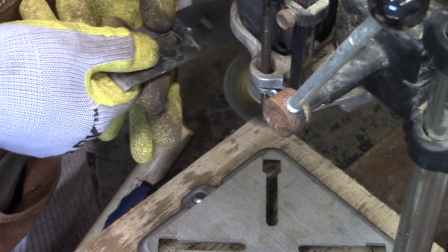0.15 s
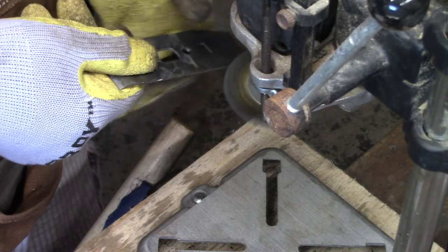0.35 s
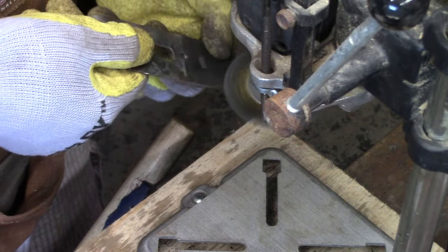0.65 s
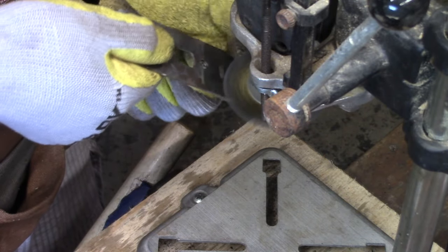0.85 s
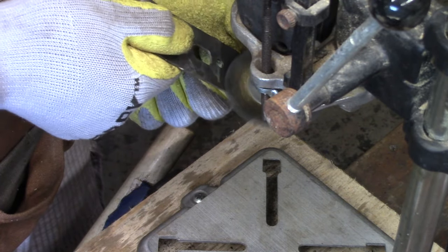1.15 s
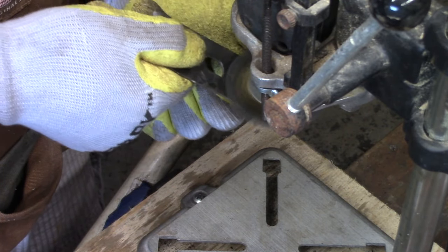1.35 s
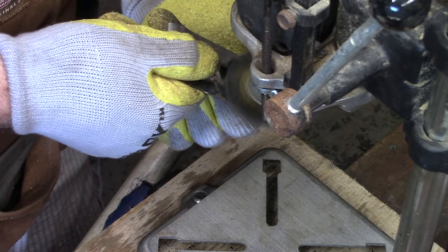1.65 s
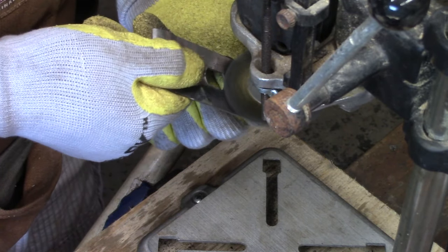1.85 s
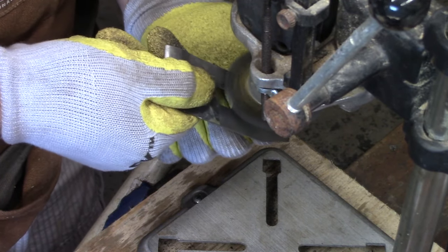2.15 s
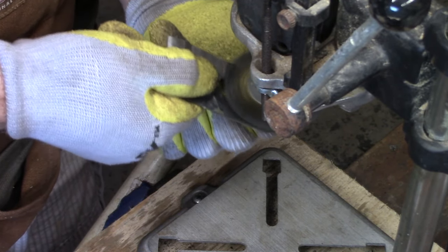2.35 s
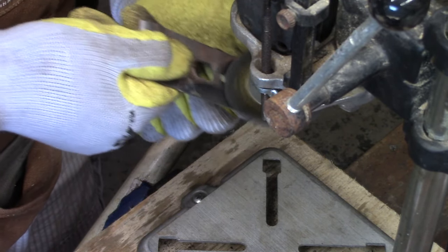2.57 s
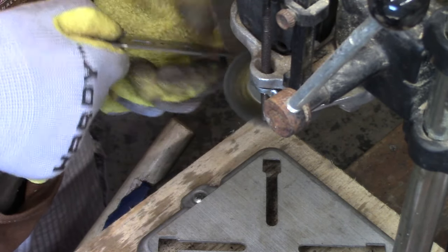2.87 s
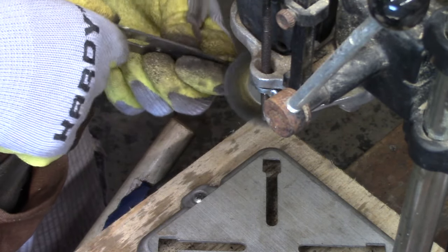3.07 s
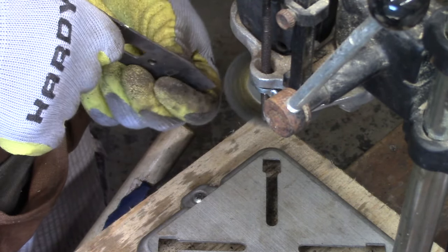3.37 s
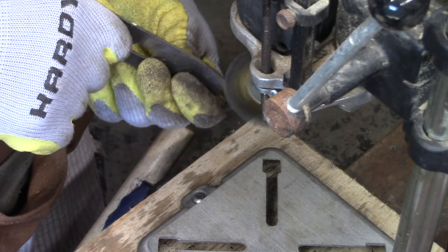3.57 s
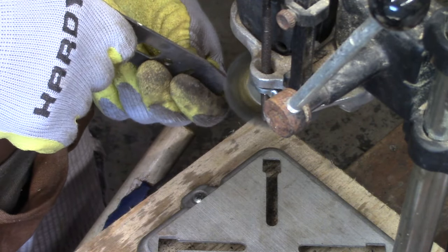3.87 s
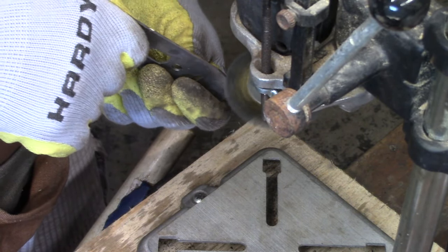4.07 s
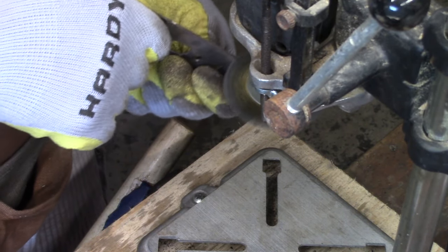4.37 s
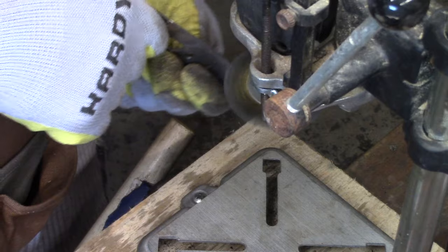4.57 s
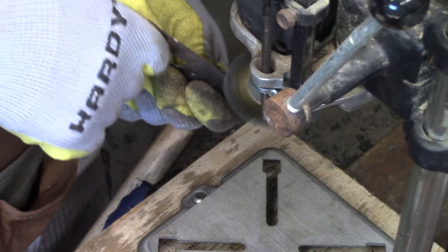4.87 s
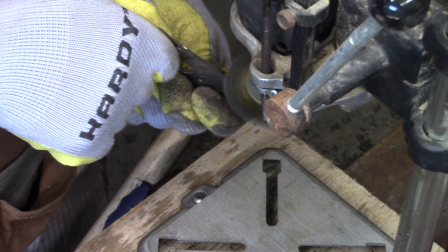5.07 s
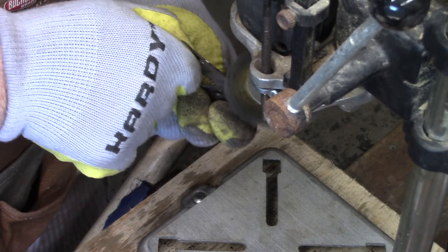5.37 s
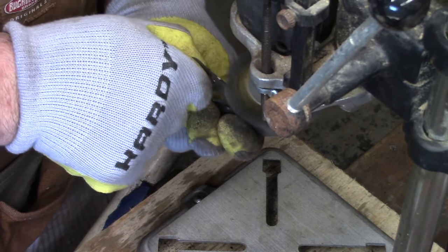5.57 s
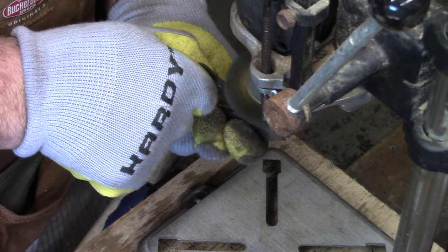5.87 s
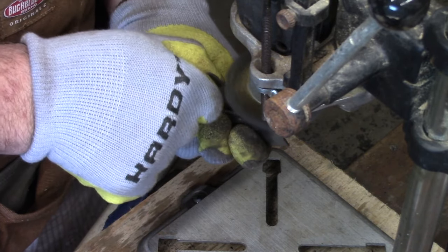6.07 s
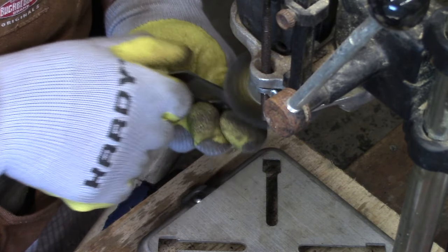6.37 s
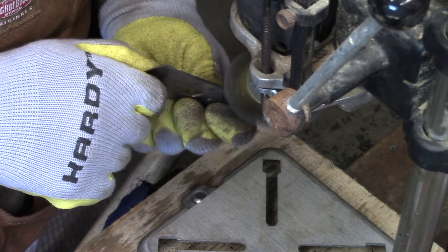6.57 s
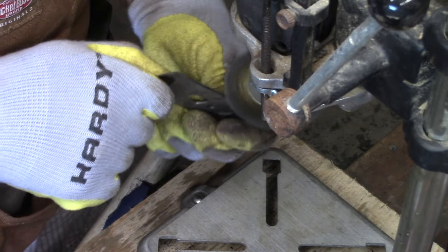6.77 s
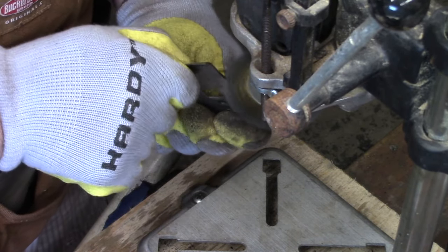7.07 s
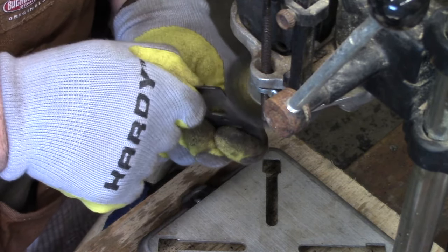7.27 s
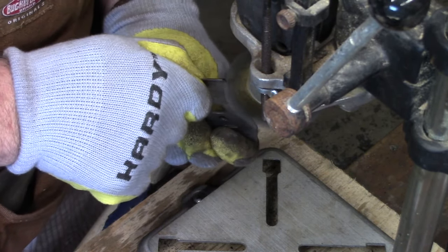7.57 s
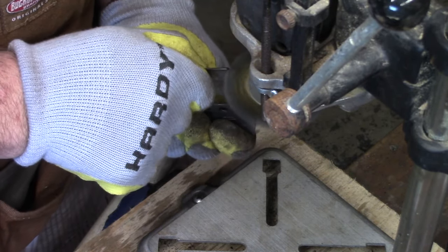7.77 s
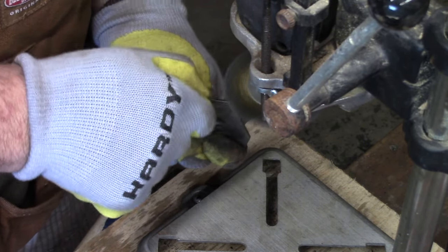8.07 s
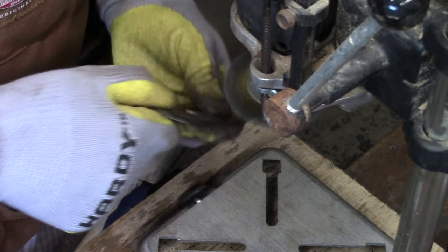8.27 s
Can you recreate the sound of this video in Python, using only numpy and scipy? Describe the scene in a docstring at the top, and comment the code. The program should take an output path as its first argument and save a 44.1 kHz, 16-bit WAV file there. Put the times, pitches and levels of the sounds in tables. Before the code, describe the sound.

Loud rattling workshop machine runs steadily while a spinning wire brush rasps against steel in uneven passes, its pitch sagging under pressure, with shrill ringing and squeals.

```python
"""A drill press clatters; its twelve-tuft wire wheel scratches a steel blade, hand-held, in several strokes.
Random impacts through frame resonances make the clatter; the spindle slows under load, gliding spindle and
tuft tones while mains hum and blade ring hold pitch. Wire-tip impacts, bunched by tuft, make the scratch.
Strokes bring buzz, stronger with drag, and frame shudder at set levels; tuft-rate harmonics make the blade sing.
Noise bands make squeals; impact bursts make snags, each with a later thud."""
import sys
import numpy as np
from scipy import signal
from scipy.fft import rfft, irfft, next_fast_len
from scipy.io import wavfile
from scipy.ndimage import uniform_filter1d

SR = 44100
rng = np.random.default_rng(int(sys.argv[2]) if len(sys.argv) > 2 else 0)


def generate_wav(sig):
    """Save sig (samples, or channels by samples) to the path in sys.argv[1] as 16-bit PCM at SR."""
    pcm = np.round(np.clip(np.atleast_2d(sig).T, -1, 1) * 32767).astype(np.int16)
    wavfile.write(sys.argv[1], SR, pcm)


N = 371763

# spindle speed, sagging as the hand leans in: time_s, speed_turns_per_s
SPINDLE_SPEED = [(0.0, 44.85), (0.4, 45.15), (1.08, 45.0), (1.49, 43.6), (1.69, 42.03), (1.77, 41.84),
                 (2.06, 43.36), (2.32, 43.15), (2.51, 42.26), (2.89, 44.18), (3.25, 44.8), (3.57, 44.96),
                 (3.76, 43.99), (4.05, 43.39), (4.26, 41.71), (4.4, 40.05), (4.49, 39.76), (4.55, 39.97),
                 (4.64, 41.08), (4.8, 42.7), (4.89, 41.95), (5.0, 42.57), (5.16, 42.57), (5.43, 41.52),
                 (5.7, 42.05), (6.05, 42.21), (6.54, 44.35), (6.88, 44.92), (7.12, 43.21), (7.35, 43.45),
                 (7.82, 41.41), (8.02, 41.5), (8.43, 44.1)]
# head, column and table resonances: centre_hz, width_hz, level_db
FRAME_MODES = [(172, 29, 8.5), (261.5, 48, 11), (487, 48, 8.5), (565, 152, 5), (762, 38, 5.5),
               (930, 34, 5.5), (990, 82, 5.5), (1094, 78, 6), (1230, 29, 6), (1294, 160, 6),
               (1687, 37, 8.5), (1809, 90, 9), (1936, 80, 7.5), (2017, 89, 9), (2094, 60, 5), (2259, 60, 6),
               (2460, 71, 7), (2662, 110, 4.5), (3030, 84, -5), (3770, 150, 3), (4620, 230, -4.5),
               (5240, 480, 2), (6300, 220, -4), (6850, 200, -1.5)]
# bearing clatter, broad colour: freq_hz, relative_level_db
CLATTER_COLOUR = [(30, -51), (70, -43), (140, -29.5), (220, -22.5), (430, -10), (900, -1.43), (1500, 0.5),
                  (2200, -0.14), (4000, -1.34), (7500, -8), (10600, -7.5), (11800, -17), (15400, -25)]
# clatter level change: time_s, level_db
CLATTER_LEVEL = [(0, 0.4), (1.1, 0.4), (1.5, 0), (3.3, 0), (3.58, 0.3), (3.85, 0), (4.55, 0), (4.85, 0.5),
                 (5.2, -0.3), (6.8, 0.5), (7.9, -0.6), (8.43, 0.6)]
# free-running machine tones, before WHINE_GAIN_DB: multiple_of_spindle_speed, level_db
WHINE_TONES = [(12, -68), (24, -57), (48, -48.6), (60, -56.5), (120, -60), (240, -63)]
# blade strokes on the wheel; levels before bite, lean and layer gains: start_s, end_s, scratch_db,
# first_bite_db, shudder_db, extra_buzz_db, song_db, song_tilt_db_per_octave, blade_ring_db
STROKES = [(0.02, 1.078, -47.5, 2, -76, 6, -58, -5, -52), (1.07, 1.807, -35.5, -1, -58, 1, -34, -10, -57),
           (1.88, 2.062, -39, -3, -61, 4, -56, -5, -56),
           (2.058, 2.53, -35.5, -2.5, -57, 0.5, -37, -8.5, -61),
           (2.55, 3.58, -44.5, 8, -76, 0, -62, -5, -60), (3.613, 3.76, -32.5, -1.5, -52, -4, -47, 1, -55),
           (3.878, 4.542, -36, 2.5, -52.5, 0.5, -40, -5.5, -58),
           (4.8, 4.893, -35.5, 2, -54, -8, -45, -5, -52), (4.94, 5.426, -35, -1.5, -54, -1, -42, -3.5, -50),
           (5.438, 6.18, -36, 0, -56, 0.5, -41, -5, -54), (6.908, 7.196, -37, 5.5, -61, -3, -40, -5, -45),
           (7.324, 7.988, -36.5, 2, -56.5, 1, -39, -5.5, -51)]
# wire scratch, broad colour: freq_hz, relative_level_db
SCRATCH_COLOUR = [(30, -38), (200, -38), (400, -18.5), (900, -3.5), (1500, -16.5), (2400, -4.5), (3400, 2),
                  (4500, -2.5), (7000, -6), (10400, -5), (11800, -14), (15400, -30.5)]
# spindle (lowest) and hand-damped blade resonances: centre_hz, width_hz, level_db
BLADE_MODES = [(506, 24, 3), (3500, 260, -3), (3790, 170, 1), (4450, 250, -4), (8350, 240, 1),
               (10500, 450, -3), (12800, 380, 0), (14650, 300, 8)]
# loaded wheel tones, relative to scratch level, before BUZZ_GAIN_DB: multiple_of_spindle_speed, level_db
BUZZ_TONES = [(2, -48), (36, -26), (72, -18), (90, -18.5), (96, -20), (156, -24), (228, -25)]
# frame shudder colour: freq_hz, relative_level_db
SHUDDER_COLOUR = [(30, -39), (115, -13), (150, -26), (210, -15.5), (272, 12.5), (320, 3.5), (450, -11.5),
                  (900, -53)]
# harmonics on which the blade sings: multiple_of_tuft_rate, relative_level_db
SONG_HARMONICS = [(7, -4), (14, -5), (21, -3)]
# sharp modes lifting the song as it glides through: centre_hz, width_hz, level_db
SONG_MODES = [(3590, 170, 0), (6700, 200, 13), (7150, 260, -3), (7500, 150, 6.5), (10030, 200, 9),
              (10600, 420, 10.5)]
# wires catching on the blade: start_s, end_s, centre_hz, width_hz, level_db
SQUEALS = [(1.5, 1.717, 3700, 480, -39), (2.38, 2.53, 3720, 300, -40), (3.9, 4.16, 3700, 800, -39.5),
           (3.62, 3.77, 12900, 180, -48), (3.62, 3.77, 14720, 330, -53), (3.88, 4.02, 12880, 160, -53),
           (4.18, 4.4, 6600, 220, -41), (5.15, 5.31, 12170, 130, -52), (5.28, 5.5, 12650, 130, -52),
           (6.91, 7.1, 8350, 200, -47), (6.91, 7.06, 10850, 300, -48), (6.91, 7.1, 3650, 900, -38),
           (5.31, 5.4, 4800, 1700, -36), (5.6, 6.2, 3745, 90, -43), (7.53, 7.82, 3510, 120, -39),
           (7.56, 7.82, 8330, 200, -48)]
# wheel snatching at a blade edge: centre_s, half_length_s, level_db
SNAGS = [(4.26, 0.006, -37.5), (4.848, 0.031, -31), (5.22, 0.026, -37)]
# snag colour: freq_hz, relative_level_db
SNAG_COLOUR = [(30, -30), (140, -26), (400, -11), (1000, -2), (3200, 7), (6000, -9), (15400, -35)]
# frame thud colour: freq_hz, relative_level_db
THUD_COLOUR = [(30, -26), (110, -16), (160, -4.5), (200, -11), (275, 4), (400, 1), (900, -38)]

TUFTS = 12
EASE_S = .06  # averaging window: spindle mass rounds off speed changes
IDLE_TURNS_PER_S, INERTIA_S = 45.12, .3007  # unloaded speed; spindle lag behind load
USUAL_DRAG_TURNS_PER_S = 4  # drag at which lean adds nothing
MAINS_HUM_DB, WHINE_GAIN_DB, BUZZ_GAIN_DB = -82.5, 1, 4.5
GRIP_S = .04  # ramp as wires bite or let go
BITE_S, RELEASE_S = 0.092, 0.047  # time constants: first bite; brushing as the blade is drawn back
FREE_SCRATCH_DB, FREE_SHUDDER_DB = -49, -63.5  # wheel between strokes, at full speed
FREE_SCRATCH_DB_PER_TURN_LOST = 0.5  # swish rises per turn/s lost
SCRATCH_DB_PER_DRAG, SONG_DB_PER_DRAG = 0.58, 0.7  # per turn/s; song only up to usual drag
HUM_DB = -9  # tuft hum at its mode's centre, relative to stroke scratch level
SONG_TOP_HZ = 11150  # song fades steeply above
RING_HZ, RING_WIDTH_HZ = 3800, 32  # blade's own note, independent of spindle speed
THUD_LAG_S, THUD_WIDTH_S, THUD_DB = 0.039, 0.045, -17.5  # delay, half length, level re snag
TOP_HZ = 15600  # recorder cutoff


def undb(db):
    """Decibels to gain."""
    return 10 ** (np.asarray(db) / 20)


def unit(x):
    """Scale to rms 1."""
    return x / np.sqrt(np.mean(x ** 2))


def walk(rate_hz):
    """Smooth random signal, rms 1, changing about rate_hz times a second."""
    size = next_fast_len(N, real=True)
    hz = np.arange(size // 2 + 1) * SR / size
    spectrum = rfft(rng.standard_normal(size)) / (1 + (hz / rate_hz) ** 2)
    return unit(irfft(spectrum, size)[:N])


def lag(x, seconds):
    """One-pole follower with the given time constant."""
    keep = np.exp(-1 / (seconds * SR))
    return signal.lfilter([1 - keep], [1, -keep], x)


def strikes(per_second, scatter_db):
    """Tiny impacts at random moments, of random sign and size."""
    struck = rng.random(N) < per_second / SR
    size = undb(scatter_db * rng.standard_normal(N))
    return struck * np.sign(rng.standard_normal(N)) * size


def unevenness(turns, count):
    """Random bumps round a rim, repeated every turn."""
    bumps = rng.standard_normal(count)
    return np.interp(turns % 1, np.arange(count) / count, unit(bumps - bumps.mean()), period=1)


def tone(turns, multiple, flutter_db, wobble_rad):
    """One multiple of the spindle speed, fluttering in level and phase; rms 1."""
    phase = 2 * np.pi * (multiple * turns + rng.random()) + wobble_rad * walk(20)
    return unit(np.sin(phase) * undb(flutter_db * walk(14)))


def resonance(hz, modes):
    """Gain of a set of modes; 1 far from all of them."""
    power = 1
    for centre_hz, width_hz, db in modes:
        power = power + undb(db) ** 2 / (1 + (2 * (hz - centre_hz) / width_hz) ** 2) ** 2
    return np.sqrt(power)


def ring(x, colour, frame_share, modes=()):
    """Minimum-phase body: broad colour, own modes and a share of the frame resonances; rms 1."""
    size = next_fast_len(N + 8192) // 2 * 2
    hz = np.maximum(np.arange(4097) * SR / 8192, 1)
    colour_hz, colour_db = np.transpose(colour)
    gain = undb(np.interp(np.log(hz), np.log(colour_hz), colour_db))
    gain = gain * resonance(hz, modes) * resonance(hz, FRAME_MODES) ** frame_share
    # a folded cepstrum makes the response causal
    cepstrum = irfft(np.log(gain))
    half = len(cepstrum) // 2
    cepstrum[1:half] *= 2
    cepstrum[half + 1:] = 0
    response = irfft(np.exp(rfft(cepstrum)))
    return unit(irfft(rfft(x, size) * rfft(response, size), size)[:N])


def frame_tones(turns, speed, table):
    """Spindle tones swell as they glide through frame resonances."""
    grid_hz = np.arange(0, SR / 2, 2)
    frame_gain = resonance(grid_hz, FRAME_MODES)
    total = 0
    for multiple, db in table:
        gain = undb(db) * np.interp(multiple * speed, grid_hz, frame_gain)
        total = total + gain * tone(turns, multiple, flutter_db=2.2, wobble_rad=.22)
    return total


def touch(start_s, end_s):
    """1 with the blade on the wheel, 0 off, with ramps."""
    t = np.arange(N) / SR
    return np.clip((t - start_s) / GRIP_S + .5, 0, 1) * np.clip((end_s - t) / GRIP_S + .5, 0, 1)


def stroke_gain(levels_db):
    """Settle from the first bite to each stroke's level, then die away."""
    t = np.arange(N) / SR
    held = 0
    for (start_s, end_s, _, bite_db, *_), db in zip(STROKES, levels_db):
        bite = bite_db * np.exp(-np.maximum(t - start_s, 0) / BITE_S)
        held = held + touch(start_s, end_s) * undb(db + bite)
    return np.maximum(held, lag(held + 1e-18, RELEASE_S))


def spindle():
    """Speed, and drag: the speed the hand's pressure would take off if held; both in turns/s."""
    time_s, turns_per_s = np.transpose(SPINDLE_SPEED)
    speed = uniform_filter1d(np.interp(np.arange(N) / SR, time_s, turns_per_s), int(EASE_S * SR))
    drag = IDLE_TURNS_PER_S - speed - INERTIA_S * np.gradient(speed) * SR
    return speed, np.maximum(uniform_filter1d(drag, int(2 * EASE_S * SR)), 0)


def machine(turns, speed):
    """Bearings and quill chatter with belt and mains, fading as the spindle slows; the motor hums on."""
    t = np.arange(N) / SR
    belt = unevenness(turns / 2, count=14)  # repeats every two spindle turns
    mains = np.sin(2 * np.pi * 120 * t)
    level_db = np.interp(t, *np.transpose(CLATTER_LEVEL))
    chatter = strikes(per_second=16000, scatter_db=2.5) * undb(belt + 0.42 * mains + level_db)
    clatter = undb(-29.0) * ring(chatter, CLATTER_COLOUR, frame_share=1.0)
    whine = undb(WHINE_GAIN_DB) * frame_tones(turns, speed, WHINE_TONES)
    speed_gain = (speed / IDLE_TURNS_PER_S) ** 2.84
    return (clatter + whine) * speed_gain + undb(MAINS_HUM_DB) * unit(mains)


def tuft_hum(turns, speed):
    """The tuft rate hums loudest where it meets a sharp spindle mode."""
    mode_hz, mode_width_hz = 505, 24
    closeness = 1 / (1 + (2 * (TUFTS * speed - mode_hz) / mode_width_hz) ** 2)
    return undb(HUM_DB) * tone(turns, TUFTS, flutter_db=1.2, wobble_rad=0.1) * closeness


def wheel(turns, speed, drag):
    """Wire tips scratch in bunches, tuft by tuft, with buzz, both stronger with drag; shudder at set levels."""
    _, _, scratch_db, _, shudder_db, buzz_db, *_ = np.transpose(STROKES)
    lean_gain = undb(SCRATCH_DB_PER_DRAG * (drag - USUAL_DRAG_TURNS_PER_S))
    swish = undb(FREE_SCRATCH_DB + FREE_SCRATCH_DB_PER_TURN_LOST * (IDLE_TURNS_PER_S - speed))
    scratching = np.hypot(stroke_gain(scratch_db) * lean_gain, swish)
    shaking = np.hypot(stroke_gain(shudder_db), undb(FREE_SHUDDER_DB))

    bunches_db = unevenness(turns, count=TUFTS) + 2.0 * np.sin(2 * np.pi * TUFTS * turns)
    tips = strikes(per_second=12000, scatter_db=4.0) * undb(bunches_db + 0.31 * walk(28))
    scratch = undb(4.5) * ring(tips, SCRATCH_COLOUR, frame_share=0.32, modes=BLADE_MODES)
    shakes = strikes(per_second=3000, scatter_db=3.0)
    shudder = ring(shakes, SHUDDER_COLOUR, frame_share=0.32) * undb(walk(5.5))
    extra_db = sum(db * touch(start_s, end_s) for (start_s, end_s, *_), db in zip(STROKES, buzz_db))
    buzz = undb(BUZZ_GAIN_DB + extra_db) * frame_tones(turns, speed, BUZZ_TONES)
    return scratching * (scratch + tuft_hum(turns, speed) + buzz) + shaking * shudder


def blade(turns, speed, drag):
    """Steel sings on tuft-rate harmonics gliding through its modes, and rings on its own note."""
    *_, song_db, tilt_db, ring_db = np.transpose(STROKES)
    grid_hz = np.arange(0, SR / 2, 2)
    lift = resonance(grid_hz, SONG_MODES) / np.sqrt(1 + (grid_hz / SONG_TOP_HZ) ** 80)
    lowest = SONG_HARMONICS[0][0]
    song = 0
    for multiple, db in SONG_HARMONICS:
        gain = stroke_gain(song_db + db + tilt_db * np.log2(multiple / lowest))
        gain = gain * np.interp(TUFTS * multiple * speed, grid_hz, lift)
        song = song + gain * tone(turns, TUFTS * multiple, flutter_db=2.6, wobble_rad=.3)
    # no two tufts catch alike: raspy tone
    rasp = 1 + .22 * walk(130) + .26 * unevenness(turns, count=TUFTS)
    swell = undb(SONG_DB_PER_DRAG * np.minimum(drag - USUAL_DRAG_TURNS_PER_S, 0))
    peak_filter = signal.iirpeak(RING_HZ, RING_HZ / RING_WIDTH_HZ, fs=SR)
    note = signal.lfilter(*peak_filter, strikes(per_second=8400, scatter_db=3))
    return song * swell * rasp + stroke_gain(ring_db) * unit(note)


def squeals():
    """Wires catching on the blade: noise bands, narrow or broad, that swell and fade."""
    t, out = np.arange(N) / SR, np.zeros(N)
    for start_s, end_s, hz, width_hz, db in SQUEALS:
        now = (t > start_s) & (t < end_s)
        edges_hz = [hz - width_hz / 2, hz + width_hz / 2]
        band = signal.butter(2, edges_hz, "bandpass", fs=SR, output="sos")
        note = unit(signal.sosfilt(band, rng.standard_normal(N)))
        swell = np.sqrt(np.sin(np.pi * (t[now] - start_s) / (end_s - start_s)))
        out[now] += undb(db) * note[now] * swell
    return out


def snags():
    """The wheel snatches at the blade's edge: a short rasp, then a dull frame thud."""
    t = np.arange(N) / SR
    rasping, thudding = 0, 0
    for at_s, width_s, db in SNAGS:
        rasping = rasping + undb(db) * np.exp(-((t - at_s) / width_s) ** 2)
        thudding = thudding + undb(db + THUD_DB) * np.exp(-((t - at_s - THUD_LAG_S) / THUD_WIDTH_S) ** 2)
    catches = strikes(per_second=5500, scatter_db=1)
    rasp = rasping * ring(catches, SNAG_COLOUR, frame_share=0.37)
    thud = thudding * ring(catches, THUD_COLOUR, frame_share=0.37)
    return rasp + thud


def scene():
    """Machine, wheel and blade share one spindle slowed by the hand; both channels are identical."""
    speed, drag = spindle()
    turns = np.cumsum(speed * (1 + .0002 * walk(8))) / SR
    sound = machine(turns, speed) + wheel(turns, speed, drag) + blade(turns, speed, drag)
    sound = sound + squeals() + snags()
    return np.array([sound, sound])


def record(dry):
    """The recorder rounds the highest peaks and cuts the top steeply."""
    ceiling = .4
    rounded = ceiling * np.tanh(dry / ceiling)
    lowpass = signal.ellip(12, .2, 80, TOP_HZ, fs=SR, output="sos")
    return signal.sosfilt(lowpass, rounded)


dry = scene()
out = record(dry)
generate_wav(out)
```